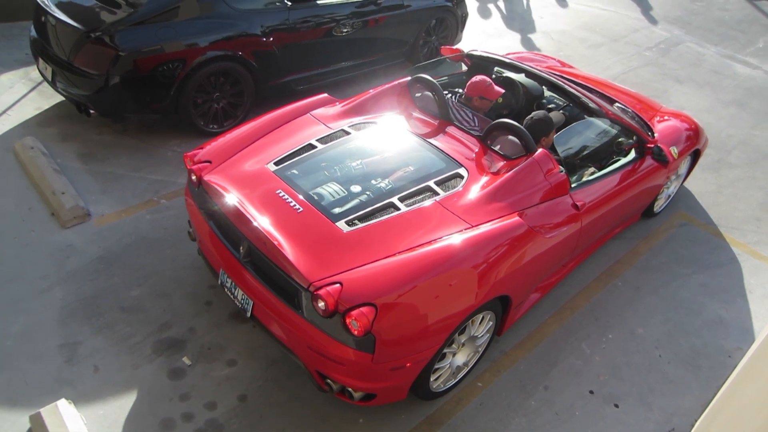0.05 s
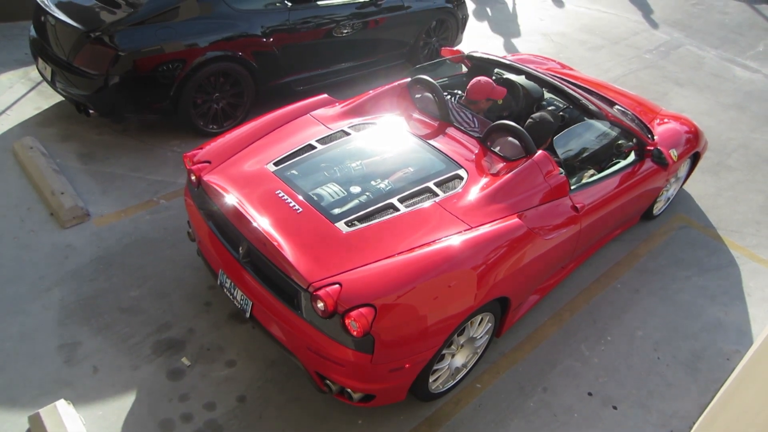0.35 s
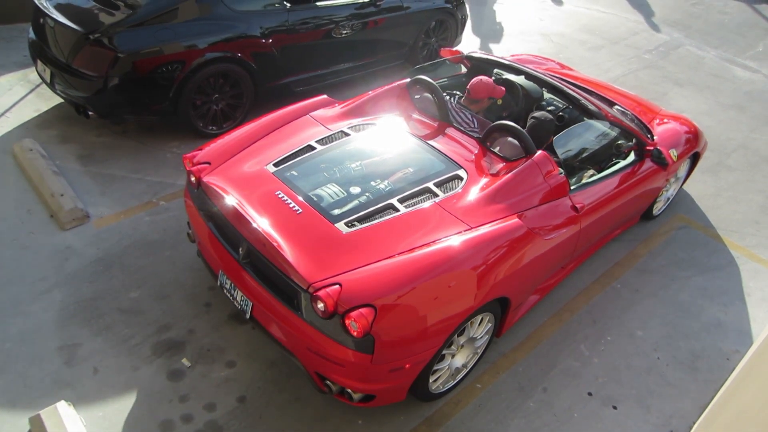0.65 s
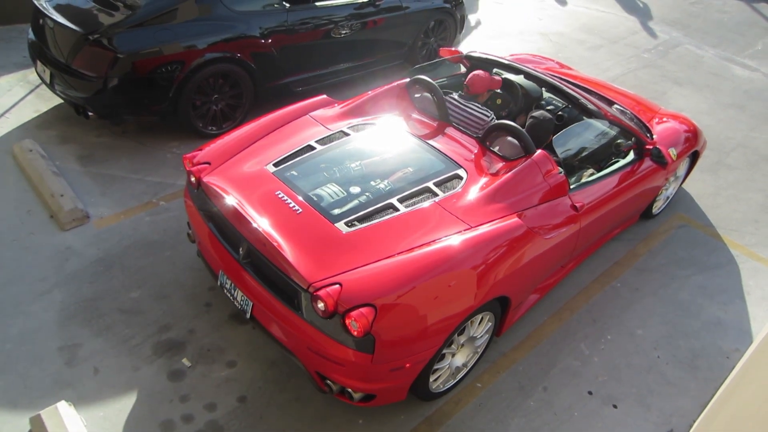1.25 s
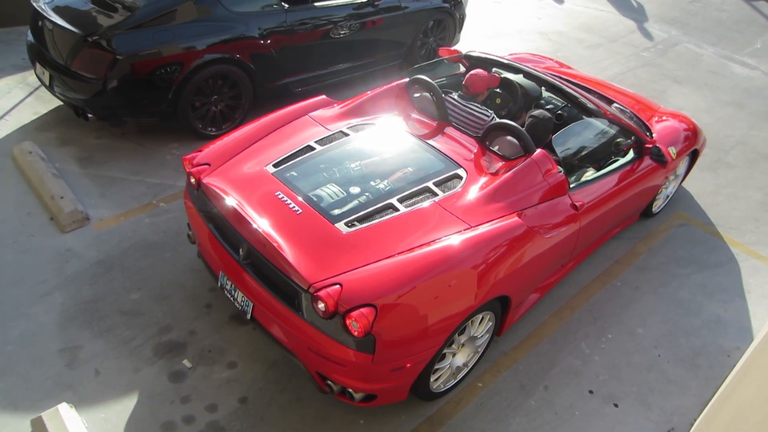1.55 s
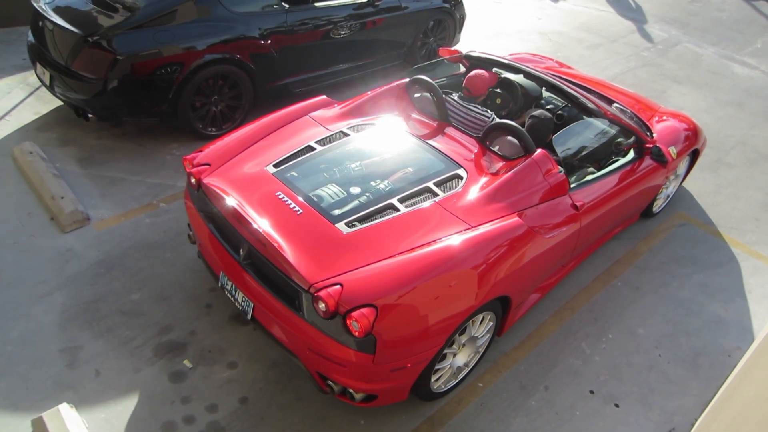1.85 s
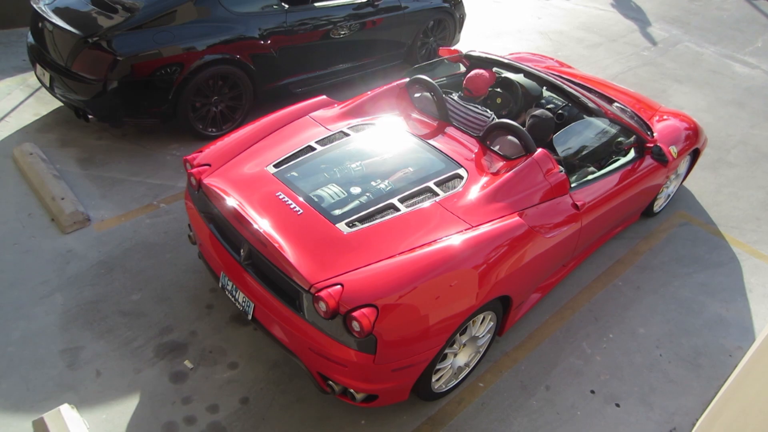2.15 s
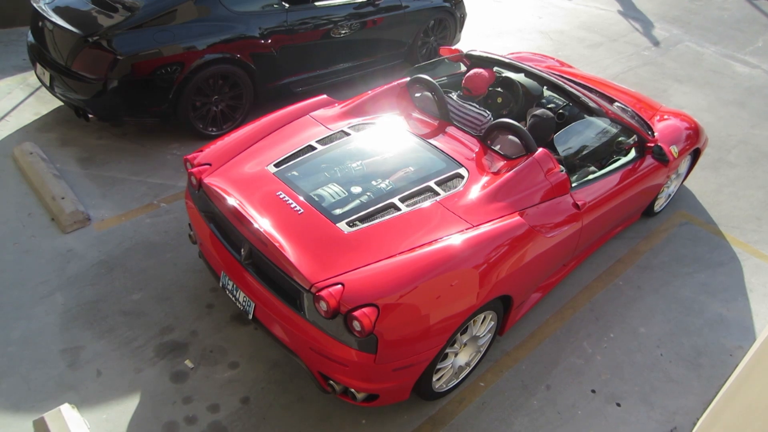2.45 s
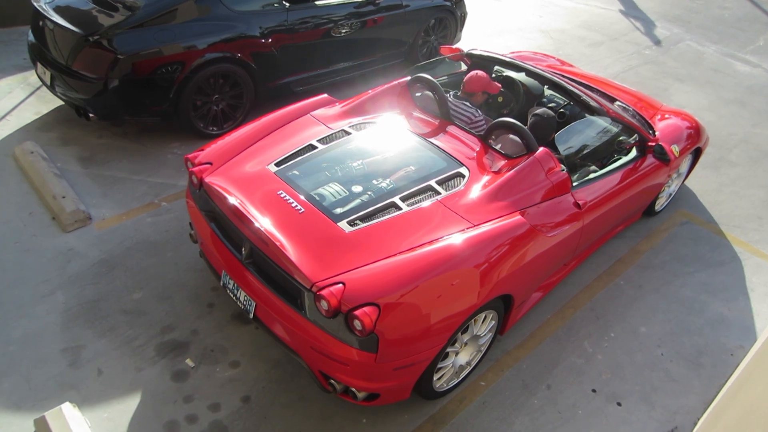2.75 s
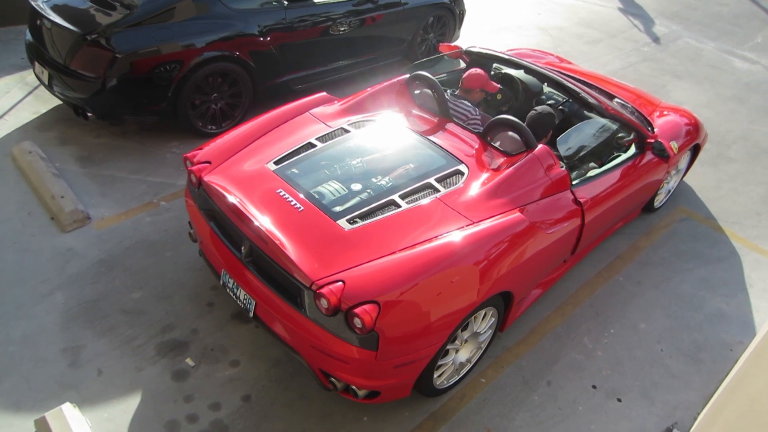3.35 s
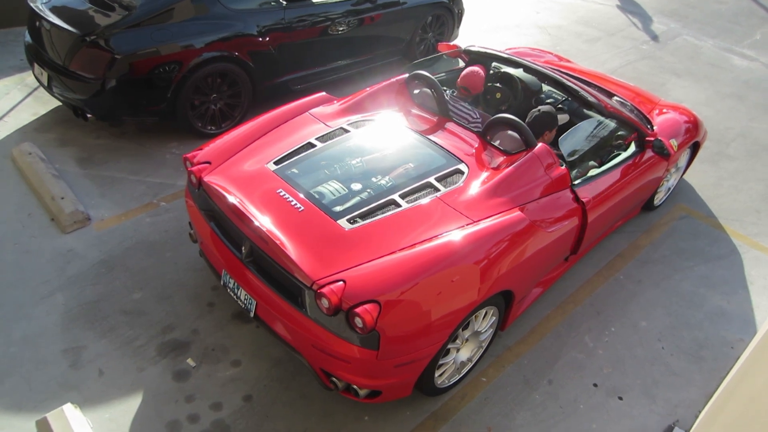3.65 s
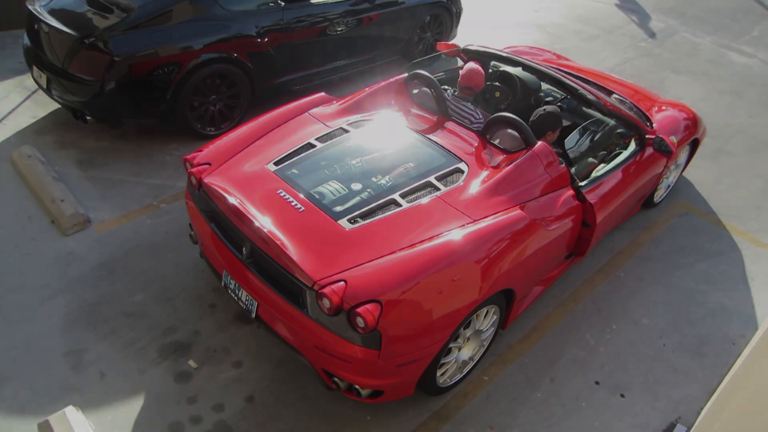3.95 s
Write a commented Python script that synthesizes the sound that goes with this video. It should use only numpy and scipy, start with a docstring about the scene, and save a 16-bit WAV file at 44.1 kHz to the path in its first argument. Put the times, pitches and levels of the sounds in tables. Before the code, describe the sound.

A car idles, shudders to a stop, then its door unlatches with soft bumps.

```python
"""A covered parking bay, one microphone by a sports car, traffic in the distance.
The car idles: exhaust pulses hum and lope through the silencer, belts and gas rush, injectors tick.
Switched off at about 2 s, it shudders to a stop, pumping air through the pipes. A sharp click follows;
the door unlatches and its panel rings. The driver starts to climb out with sliding clothes, a jingle
of keys and a few soft bumps. Clicks, door and driver carry a short tail from the concrete."""
import sys
import numpy as np
from scipy import signal
from scipy.fft import rfft, irfft
from scipy.io import wavfile

SR = 44100
rng = np.random.default_rng(int(sys.argv[2]) if len(sys.argv) > 2 else 0)


def master_out(mix):
    """Clip the mix to full scale and print it as 16-bit PCM to the path in sys.argv[1]."""
    frames = np.transpose(np.atleast_2d(mix))
    ceiling = np.clip(frames, -1, 1)
    pcm = np.round(ceiling * 32767).astype(np.int16)
    wavfile.write(sys.argv[1], SR, pcm)


N = 176400
T = np.arange(N) / SR

# distant traffic (time [s], level [dB])
TRAFFIC_LEVEL = [(0, -32), (2.45, -36), (2.75, -36), (3.0, -35), (3.25, -35.5), (3.5, -33), (4, -33.5)]
# its rumble as heard from the bay (frequency [Hz], relative level [dB])
TRAFFIC_COLOUR = [(12, -31), (20, 5), (43, -1), (71, -12), (107, -4), (126, -6), (202, -3), (369, -9.5),
                  (577, -8), (1060, -14.5), (1200, -18), (1740, -21.5), (4360, -42), (7180, -48),
                  (10600, -63), (13800, -94), (22000, -120)]

# clothes sliding on the seat (time [s], level [dB], half length [s])
RUSTLES = [(3.0, -55, .14), (3.44, -49.5, 0.026), (3.54, -53, 0.046), (3.626, -62, 0.033),
           (3.765, -53.5, 0.047), (3.968, -49, 0.019)]
# cloth friction (frequency [Hz], relative level [dB])
CLOTH_COLOUR = [(200, 0), (700, -0.5), (1600, 11), (3000, 5), (4200, -17), (6500, -8), (9500, -22),
                (11500, -41)]
# keys striking each other (time [s], level [dB])
JINGLES = [(3.73, -46), (3.741, -58), (3.765, -69)]
# key resonances (frequency [Hz], relative level [dB], t60 [s])
KEY_MODES = [(2700, -6, .15), (3122, -5, .22), (8000, -13, .2), (8130, -9, 0.13), (9060, -20, 0.12),
             (9700, -23, .16)]
# hiss of each key strike (frequency [Hz], relative level [dB])
KEY_HISS = [(1000, 2), (2700, 8.5), (4500, -2), (7000, -4.5), (9500, -2), (11000, -19), (15000, -16.5)]

# sharp clicks: ignition key or relay as the engine stops, then the door latch (time [s], level [dB])
CLICKS = [(2.3075, -35.5), (2.3355, -49), (3.3094, -42.5)]
# their bright snap (frequency [Hz], relative level [dB])
CLICK_COLOUR = [(500, -20), (1500, 11.5), (3000, 4.5), (5500, -2.5), (8500, -4.5), (10000, -12),
                (11500, -24), (15000, -18.5)]
# knocks on door and cabin (time [s], level [dB], rise [s], t60 [s])
KNOCKS = [(3.3078, -25, .001, 0.11), (3.328, -26, 0.011, .3), (3.589, -27.5, 0.014, 0.15),
          (3.622, -28.5, 0.005, 0.13), (3.8, -25, 0.008, 0.26), (3.931, -27.5, .008, .18)]
# their dull body (frequency [Hz], relative level [dB])
KNOCK_COLOUR = [(40, -11), (120, -3.5), (220, -4.5), (310, -0.5), (450, 0), (600, -2), (900, -9),
                (1300, -14.5), (2000, -22.5), (3000, -32), (5000, -43), (11000, -62.5)]
# door panel resonances (frequency [Hz], level [dB], t60 [s])
PANEL_MODES = [(212.5, -37, 0.17), (285.4, -24.5, 0.19), (352, -27, 0.15), (460, -37, 0.14),
               (696, -36, 0.13), (875, -37, 0.12)]

# injector ticks (frequency [Hz], relative level [dB])
TICK_COLOUR = [(2000, -18), (4000, -15.5), (6000, -2), (8000, -3.5), (10000, -8.5), (11000, -31),
               (12500, -49.5)]
# pings of metal parts (time [s], frequency [Hz], level [dB], half length [s])
PINGS = [(0.098, 550, -25.5, 0.019), (0.143, 1405, -31.5, 0.01), (0.306, 1412, -37.5, .025),
         (0.988, 1693, -41.5, .015), (1.882, 1724, -40.5, 0.015), (3.382, 2970, -53, 0.018)]
# rush from the engine bay (time [s], level [dB])
RUSH_LEVEL = [(0, -26.5), (.09, -28), (.18, -31.5), (.42, -31), (.6, -32.5), (.9, -33.5), (1.2, -35),
              (1.6, -33), (1.87, -31.5), (2.1, -34), (2.25, -40), (2.42, -46.5), (2.6, -74)]
# belt and gas noise (frequency [Hz], relative level [dB])
RUSH_COLOUR = [(25, 5), (45, 6.5), (78, 6), (110, 0), (180, 2.5), (270, 0), (370, 8), (460, -13), (580, 0),
               (1000, -6.5), (1900, -16), (2900, -19), (4200, -32.5), (8500, -38.5), (10000, -48),
               (11200, -67.5), (13000, -89)]
# ringing engine parts (frequency [Hz], width [Hz], level against the rush [dB])
ENGINE_RINGS = [(541.2, 10, -11), (803, 18, -19.5), (1150, 19, -23.5), (1395, 24, -27), (1665, 47, -20.5),
                (7090, 320, -40.5), (7940, 260, -42.5), (8460, 170, -43)]

# air pumped by the coasting engine (time [s], level [dB])
PUMPING_LEVEL = [(1.9, -56.5), (2.02, -26.5), (2.12, -28), (2.25, -34), (2.34, -41), (2.45, -44),
                 (2.6, -53)]
# pipe resonances (frequency [Hz], width [Hz], relative level [dB])
PIPE_RINGS = [(101, 70, -1.5), (146.7, 11, 1), (223.3, 17, 1), (314.3, 8.1, -8.5), (353.3, 14, -8.5)]
# low pipe rumble as the slowing pulses pass its resonance (time [s], frequency [Hz], level [dB])
PIPE_RUMBLE = [(2.03, 65.6, -78), (2.08, 62.5, -18.5), (2.125, 58.35, -37), (2.17, 52.93, -21.5),
               (2.235, 42.5, -15), (2.28, 39.8, -22), (2.335, 41.68, -29.5), (2.375, 40.4, -18),
               (2.425, 37.6, -45), (2.5, 36, -36), (2.6, 35, -90)]

# engine at idle (time [s], exhaust cycle rate [Hz], lope level [dB])
IDLE = [(0.0, 32.54, -14.5), (0.1, 33.87, -14.5), (0.38, 33.85, -15), (0.55, 34.08, -16),
        (0.71, 33.5, -14.5), (0.9, 34.37, -16), (1.16, 33.58, -16.0), (1.3, 33.13, -21), (1.42, 33.23, -16),
        (1.58, 33.76, -15.5), (1.7, 33.32, -20), (1.83, 33.9, -15), (1.94, 33, -18), (2.05, 34.67, -13.5)]
# engine after switch-off (time [s], exhaust cycle rate [Hz], lope level [dB])
RUN_DOWN = [(2.09, 33.5, -26), (2.14, 30, -21.5), (2.22, 23, -27), (2.3, 18, -31), (2.4, 13, -40),
            (2.46, 2.2, -78)]
# even exhaust pulses (time [s], level [dB])
FIRING_LEVEL = [(0, -20), (1.0, -19), (1.3, -24), (2.05, -21), (2.13, -25.5), (2.24, -29.5), (2.36, -34.5),
                (2.46, -79)]
# silencer's response to even pulses (frequency [Hz], relative gain [dB])
SILENCER_EVEN = [(20, -47), (68, -6.5), (135, 1.5), (203, -3), (270, -22), (338, -7.5), (405, -12),
                 (470, -33.5), (540, -28.5), (800, -36), (1500, -37.5), (4000, -88.5), (11000, -110)]
# its response to the lope between cylinder banks (frequency [Hz], relative gain [dB])
SILENCER_LOPE = [(15, -37), (34, -22.5), (101, -7), (142, -10), (169, 2.5), (203, -4.5), (236, -19.5),
                 (268, -32), (304, -13), (372, -16.5), (440, -49.5), (700, -52.5), (1500, -57), (4000, -93),
                 (11000, -110)]
# swell of the upper exhaust overtones (time [s], gain [dB])
OVERTONE_SWELL = [(0, 0), (.08, 5), (.2, -0.5), (.45, 1), (.7, -3), (.82, 3), (.95, 2), (1.15, -2),
                  (1.33, 3), (1.6, 1), (1.85, 1.5), (1.95, -2), (2.03, 5.5), (2.2, -8), (2.35, -11)]


def amp(db):
    return 10 ** (np.asarray(db) / 20)


def unit_rms(x):
    return x / np.sqrt(np.mean(x ** 2) + 1e-20)


def curves(rows):
    """One value per sample for each column after the time."""
    times, *columns = np.transpose(rows)
    return [np.interp(T, times, column) for column in columns]


def gain(colour, size):
    """Gain of a colour table on an FFT grid."""
    hz, db = np.transpose(colour)
    grid_hz = np.fft.rfftfreq(size, 1 / SR)
    return amp(np.interp(np.log(grid_hz + 1), np.log(hz + 1), db))


def noise(colour):
    """Coloured noise of rms 1."""
    return unit_rms(irfft(rfft(rng.standard_normal(N)) * gain(colour, N), N))


def ring(hz, width_hz, max_q=45):
    """Noise of rms 1 in one resonance, widened if its Q would exceed max_q."""
    detuning = 2 * (np.fft.rfftfreq(N, 1 / SR) - hz) / max(width_hz, hz / max_q)
    return unit_rms(irfft(rfft(rng.standard_normal(N)) / (1 + detuning ** 2), N))


def impulse_response(colour, size=8192):
    """Minimum-phase response with the given colour."""
    cepstrum = irfft(np.log(gain(colour, size)))
    cepstrum[1:size // 2] *= 2
    cepstrum[size // 2 + 1:] = 0
    return irfft(np.exp(rfft(cepstrum)))


def strike(start, rise, t60):
    """Envelope of a blow: quick rise, exponential decay."""
    age = np.maximum(T - start, 0)
    return (1 - np.exp(-age / rise)) * np.exp(-np.log(1000) * age / t60)


def swell(centre, half_length):
    """Bell-shaped envelope."""
    return np.exp(-.5 * ((T - centre) / half_length) ** 2)


def traffic():
    """Far-off traffic, a low rumble behind the car."""
    return amp(curves(TRAFFIC_LEVEL)[0]) * noise(TRAFFIC_COLOUR)


def parking_bay(direct, t60=.36, tail_db=-13.5):
    """Reflections off the concrete reach the microphone just after the direct sound."""
    tail = (rng.standard_normal(N) * strike(.006, .0046, t60))[:SR]
    return direct + amp(tail_db) * signal.fftconvolve(direct, tail / np.linalg.norm(tail))[:N]


def clothes():
    """The driver's clothes rub over the seat in soft strokes."""
    return sum(amp(db) * swell(at, half) for at, db, half in RUSTLES) * noise(CLOTH_COLOUR)


def keys(hiss_db=1):
    """Keys collide; each hit rings their high modes with a burst of hiss."""
    def hits(t60):
        return sum(amp(db) * strike(at, .001, t60) for at, db in JINGLES)
    ringing = sum(amp(db) * hits(t60) * ring(hz, width_hz=90) for hz, db, t60 in KEY_MODES)
    return ringing + amp(hiss_db) * hits(t60=.15) * noise(KEY_HISS)


def clicks_and_door(unlatch_s=3.3075):
    """Ignition key or relay snaps; later the door unlatches, its panel rings and dull knocks follow."""
    clicks = sum(amp(db) * strike(at, rise=.0004, t60=.065) for at, db in CLICKS)
    knocks = sum(amp(db) * strike(at, rise, t60) for at, db, rise, t60 in KNOCKS)
    panel = sum(amp(db) * strike(unlatch_s, .001, t60) * np.sin(2 * np.pi * (hz * T + rng.random()))
                for hz, db, t60 in PANEL_MODES)
    return clicks * noise(CLICK_COLOUR) + knocks * noise(KNOCK_COLOUR) + panel


def injectors(cycles, level_db=-66, weak_db=-2, scatter_db=2, end_s=1.8):
    """Fine, uneven ticks, a strong and a weak one each cycle, ending just before the run-down."""
    ticks = np.maximum(2 * (cycles - .12), 0)
    index = ticks.astype(int)
    sizes = amp(weak_db * (index % 2) + scatter_db * rng.standard_normal(N)[index])
    envelope = unit_rms(np.exp(-3.3 * (ticks % 1)) * sizes)
    return amp(level_db) * envelope * noise(TICK_COLOUR) * (T < end_s)


def pings():
    """Metal parts swell briefly at their own pitch."""
    return sum(amp(db) * swell(at, half) * np.sin(2 * np.pi * hz * T) for at, hz, db, half in PINGS)


def engine_bay(cycles, pulse_depth=.12):
    """Belts and gas rush and ring a few parts, pulsing once per exhaust cycle."""
    rush = noise(RUSH_COLOUR) + sum(amp(db) * ring(hz, width) for hz, width, db in ENGINE_RINGS)
    pulsing = 1 + pulse_depth * np.cos(2 * np.pi * (cycles - .45))
    return amp(curves(RUSH_LEVEL)[0]) * rush * pulsing


def pumping():
    """The coasting engine blows air through the pipe resonances."""
    pipes = sum(amp(db) * ring(hz, width) for hz, width, db in PIPE_RINGS)
    return amp(curves(PUMPING_LEVEL)[0]) * pipes


def pipe_rumble():
    """A low rumble booms in the pipe as the slowing pulses sweep through its resonance; its pitch settles near
    40 Hz."""
    hz, level_db = curves(PIPE_RUMBLE)
    return amp(level_db) * (T > PIPE_RUMBLE[0][0]) * np.sin(2 * np.pi * np.cumsum(hz) / SR)


def exhaust_pulses(cycles, level_db, silencer, sign, jitter_s=.00007, scatter_db=1.06):
    """Two pulses a cycle through the silencer; sign -1 gives the alternating part, the lope."""
    index = np.arange(int(2 * cycles[-1]))
    early_late, weakness = rng.standard_normal((len(index), 2)).T
    times = np.interp(index / 2, cycles, T) + jitter_s * early_late
    samples = np.clip(np.round(times * SR).astype(int), 0, N - 1)

    def through_silencer(sizes):
        pulses = np.bincount(samples, sign ** index * sizes, N)
        return signal.fftconvolve(pulses, impulse_response(silencer))[:N]
    idle_rms = np.std(through_silencer(1)[:SR])
    pulse_db = np.interp(times, T, level_db) - scatter_db * weakness
    return through_silencer(amp(pulse_db)) / idle_rms


def tailpipes(cycles, lope_db, overtone_hz=265):
    """The main hum at the microphone: even pulses plus the lope; the upper overtones swell and ease."""
    even = exhaust_pulses(cycles, curves(FIRING_LEVEL)[0], SILENCER_EVEN, sign=1)
    lope = exhaust_pulses(cycles, lope_db, SILENCER_LOPE, sign=-1)
    hum = even + lope
    upper = signal.sosfiltfilt(signal.butter(4, overtone_hz, "high", fs=SR, output="sos"), hum)
    return hum + (amp(curves(OVERTONE_SWELL)[0]) - 1) * upper


def scene():
    """Car, driver and distant traffic as they meet at the microphone, in mono."""
    cycle_hz, lope_db = curves(list(IDLE) + list(RUN_DOWN))
    cycles = .27 + np.cumsum(cycle_hz) / SR  # starts partway through an exhaust cycle
    engine = tailpipes(cycles, lope_db) + pipe_rumble() + pumping() + engine_bay(cycles) + injectors(cycles)
    return (traffic() + parking_bay(clicks_and_door() + keys() + clothes()) + pings() + engine)[None]


def record(dry, low_cut_hz=27, top_hz=15700):
    """The microphone drops the deepest bass and keeps nothing above its band limit."""
    hz = np.fft.rfftfreq(2 * N, 1 / SR)
    response = (1 - np.exp(-(hz / low_cut_hz) ** 2)) * (hz < top_hz)
    return irfft(rfft(dry, 2 * N) * response)[:, :N]


dry = scene()
out = record(dry)
master_out(out)
```